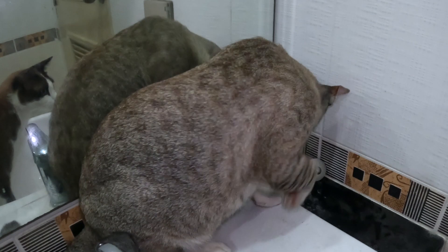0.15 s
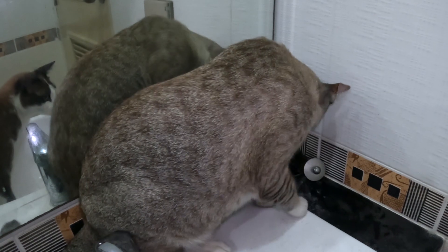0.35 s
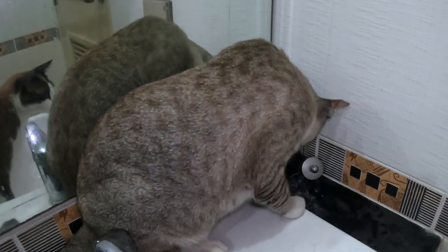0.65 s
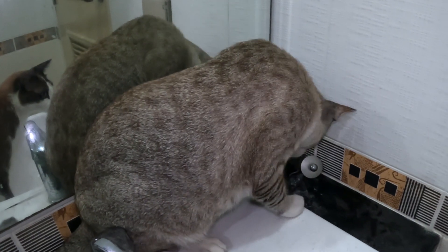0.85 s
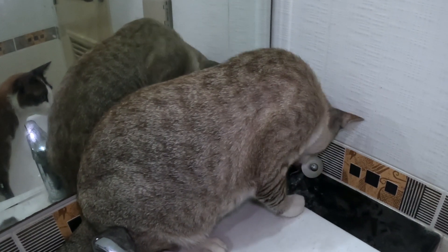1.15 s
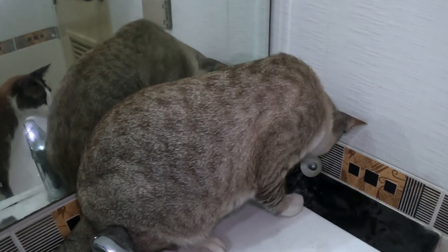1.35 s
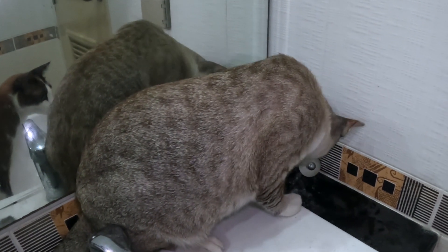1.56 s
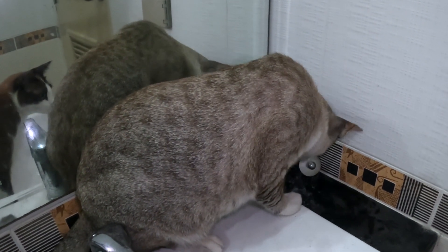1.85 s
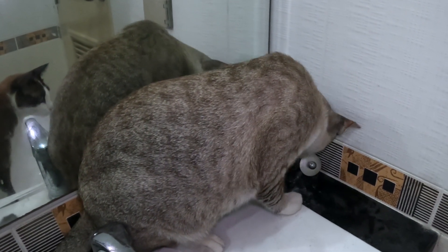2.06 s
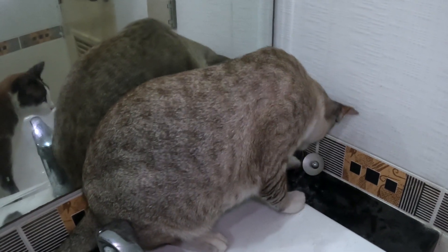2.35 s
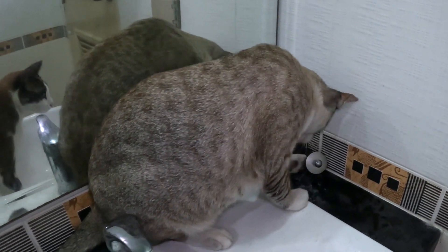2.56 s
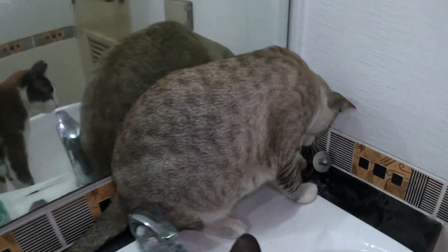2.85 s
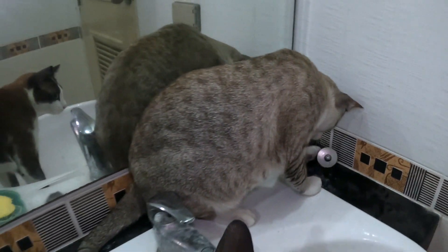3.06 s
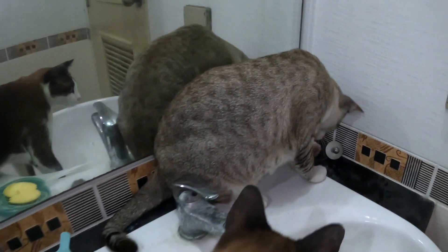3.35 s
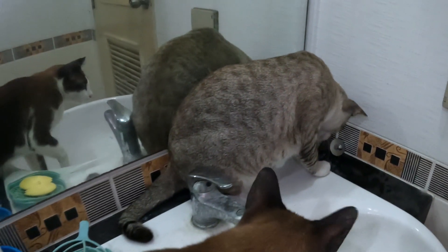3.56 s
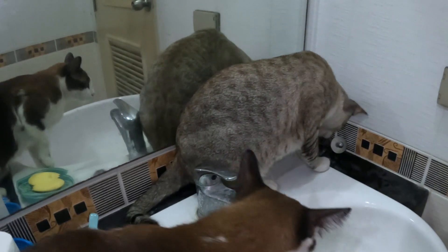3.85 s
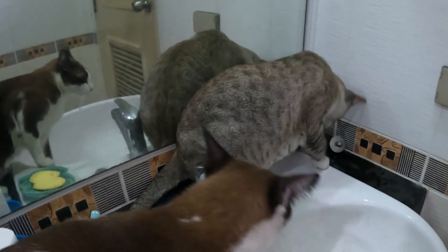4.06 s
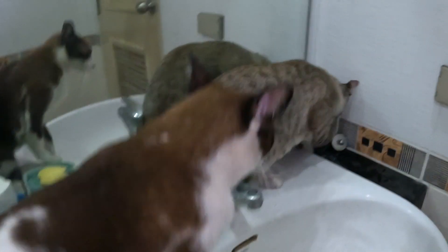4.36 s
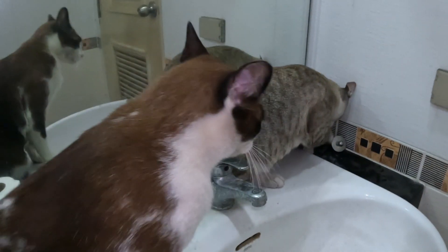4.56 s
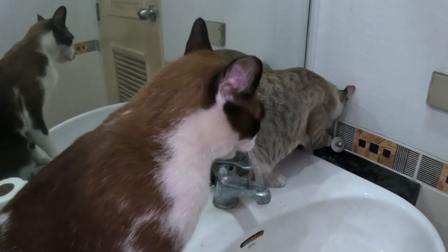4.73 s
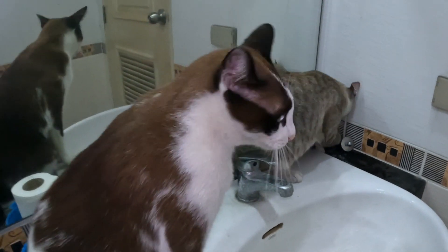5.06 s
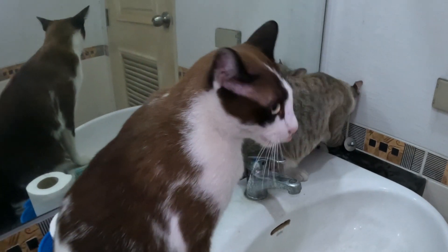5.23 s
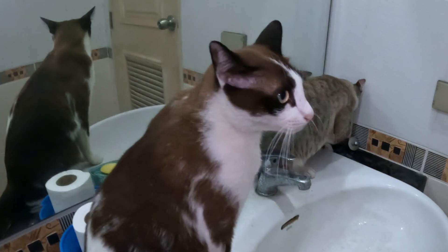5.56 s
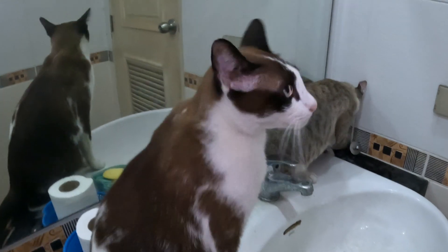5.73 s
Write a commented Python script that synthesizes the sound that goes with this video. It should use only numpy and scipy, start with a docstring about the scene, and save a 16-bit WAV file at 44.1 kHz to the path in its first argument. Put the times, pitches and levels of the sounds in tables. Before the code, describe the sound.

Over a soft rush of air and a low fan hum, a cornered mouse gives a run of very short, high squeaks. They thin out while a dull paw knock and several sharp claw clicks sound on a counter, then come back in a longer, hoarser burst before trailing off. The microphone is nearby in a small bathroom whose tiles ring briefly after each sound.

```python
"""Tiled bathroom: a mouse, cornered by a cat behind the sink, squeaks in clusters.
Thin whistles break into rasps (uneven vocal fold pulses ringing the throat) and lower, arched squeals.
Paws bump and claws click on the counter; near walls echo and the tiles ring on.
A fan's mains hum and soft rush of air fill the room and stir its low modes."""
import sys
import numpy as np
from scipy import signal
from scipy.fft import rfft, irfft, next_fast_len
from scipy.io import wavfile
from scipy.ndimage import map_coordinates

SR = 44100
rng = np.random.default_rng(int(sys.argv[2]) if len(sys.argv) > 2 else 0)


def transcribe(signal):
    """Save signal, clipped to [-1, 1], as a 16-bit WAV file at the path in sys.argv[1]."""
    frames = np.atleast_2d(signal).T
    limited = np.clip(frames, -1, 1)
    pcm = np.round(limited * 32767).astype(np.int16)
    wavfile.write(sys.argv[1], SR, pcm)


N = 259969

# motor hum lines: f/Hz, relative level/dB
HUM_LINES = [(100.1, -57), (200.2, -75), (300.3, -86)]
# hum envelope: t/s, level/dB
HUM_LEVEL = [(.8, -49), (2.8, -50.5), (5.2, -53.5)]
# air rush spectrum: f/Hz, relative density/dB
AIR_SPECTRUM = [(20, -24), (45, -25), (80, -11.5), (170, -14), (260, -14.5), (450, -17), (950, -25.5),
                (1400, -20.5), (3000, -25.5), (7000, -36.5), (10500, -48), (12800, -34), (14000, -37)]
# air rush envelope: t/s, level/dB
AIR_LEVEL = [(1.2, -61), (2.4, -58)]
# low room modes: f/Hz, half-width/Hz, level/dB
ROOM_MODES = [(70, 2.8, -71.5), (126.9, 6.6, -64.5), (147, 16, -65), (311.5, 8.3, -74)]
# envelope of all modes: t/s, gain/dB
MODE_GAIN = [(1.2, 5), (1.7, -1.5), (3.1, 2.5), (4.5, -12), (5.8, -4)]
# paws on the counter: t/s, scuff level/dB, t60/s, scuff tilt/(dB/oct), knock f/Hz, knock level/dB
PAW_BUMPS = [(1.470, -63, 0.22, 1.5, 600, -79), (1.570, -58, 0.18, -1, 600, -82),
             (1.836, -58.5, 0.45, 0.5, 600, -76), (2.504, -48.5, 0.27, -3.5, 610, -66),
             (2.522, -34, 0.055, -5, 656, -39.5), (3.023, -46, 0.44, -2, 403, -58),
             (3.604, -48, 0.41, -5, 635, -50), (3.612, -49, 0.43, -0.5, 294, -50)]
# paw scuff spectrum: f/Hz, relative density/dB
SCUFF_SPECTRUM = [(30, -41), (200, -9), (400, -6), (750, 0.5), (1100, -3.5), (2500, 6.5), (6500, -2),
                  (10000, -10.5), (16000, -16)]
# thin high squeaks: t/s, length/s, f/Hz, level/dB, 2nd harmonic/dB, roughness/0-1
WHISTLES = [ (1.642, 0.018, 3577, -42, -13.5, 0.11), (1.869, 0.016, 3777, -41, -5.5, 0.28),
            (1.928, 0.015, 3830, -32, -7.5, 0.29), (2.118, 0.013, 3768, -34, -11.5, 0.09),
            (2.2, .045, 3650, -35, -8, .55), (2.239, 0.025, 3645, -32.5, -8, 0.16),
            (2.54, 0.043, 3567, -38, -2, 0.54), (2.592, 0.02, 3715, -30.5, -11, 0.2),
            (2.887, .018, 3810, -35.5, -12.5, 0.1), (3.224, 0.054, 3825, -42, -21, 0.13),
            (3.747, 0.12, 3810, -40, -2.5, 0.21), (4.2455, 0.056, 3850, -31.5, -17, 0.08),
            (4.420, 0.01, 3830, -29, -9.5, 0), (4.475, 0.0055, 3985, -28, -2, 0),
            (4.681, 0.0345, 3876, -33.5, -5, .1), (4.783, 0.061, 3815, -33, -9.5, 0.11),
            (4.907, 0.011, 3905, -38.5, -10, 0.15), (5.071, 0.034, 3870, -33.5, -8.5, 0.16),
            (5.151, 0.03, 3744, -34.5, -6.5, 0.11), (5.471, 0.047, 3835, -37, -1, 0.08),
            (5.839, 0.019, 3830, -41, -6.5, 0.09)]
# voice brightness, muffled then shrill: t/s, tilt/(dB/oct)
VOICE_TILT = [(1.9, -3.5), (2.6, -3.5), (3.7, 2.5), (4.4, 1), (5.5, 1)]
# hoarse cries: t/s, length/s, f/Hz, start offset/share of f, level/dB, pulse scatter/cycles
RASPS = [ (1.874, 0.0085, 1142, 0.09, -46, 0.086), (1.917, 0.018, 1362, -0.053, -42, 0.07),
         (2.196, 0.056, 846, 0.53, -38, 0.11), (2.537, 0.053, 849, 0.41, -34, 0.19),
         (3.776, 0.03, 741.5, 0.082, -44.5, 0.32), (4.284, 0.035, 959, -0.041, -34.5, 0.22),
         (4.334, 0.092, 1174, 0.06, -35.5, 0.21), (4.484, 0.062, 1173, 0, -36, 0.245),
         (4.707, 0.0756, 761.5, 0, -34, 0.081), (4.908, 0.033, 775, -0.07, -32, 0.14),
         (5.095, 0.071, 755, -0.019, -37, 0.1), (5.308, 0.022, 1213, -0.038, -39, 0.11)]
# throat response: f/Hz, gain/dB
THROAT_RESPONSE = [(400, -54), (900, -14.5), (1500, -1.5), (2400, 5.5), (3000, 0.5), (3700, 3.5),
                   (4600, 0.5), (5700, -3.5), (7400, -6), (8500, 2.5), (10500, -15), (13000, 0.5),
                   (16000, -40)]
# lower cries: t/s, length/s, top f/Hz, climb/share of f, level/dB, 2nd harmonic/dB, roughness/0-1
SQUEALS = [ (1.917, .016, 2750, 0.15, -36, -14, 0.23), (4.306, 0.042, 2472, .19, -37, 10, 0.07),
           (4.349, 0.035, 2341, 0.0208, -35, 5, 0.3), (4.491, .048, 2403, 0.0498, -36, 2.5, 0.1),
           (4.728, 0.02, 2237, 0.021, -38.5, -6, 0.18), (4.913, 0.015, 2435, 0.115, -40, -9, 0.45),
           (5.096, 0.046, 2280, 0.028, -37, -.5, 0.09), (5.309, 0.038, 2428, 0.024, -41.5, -2.5, 0.38)]
# claws on the counter: t/s, level/dB, ring f/Hz
CLAW_CLICKS = [(2.826, -19.5, 1730), (2.869, -27.5, 1920), (3.288, -29, 1900), (3.313, -29, 2330),
               (3.486, -24, 4600), (3.498, -24.5, 4670), (3.529, -25.5, 1850), (4.464, -26, 1920),
               (4.615, -33, 2740), (5.435, -32, 1860)]
# claw strike colour: f/Hz, gain/dB
CLAW_RESPONSE = [(500, -57), (1100, -17), (1500, 0), (2200, -1.5), (3000, -3.5), (4800, -8), (5700, -20.5),
                 (8000, -25), (11000, -28), (15000, -40)]
# tiled room decay: f/Hz, t60/s
TILE_DECAY = [(150, 0.86), (600, 0.48), (1500, 0.61), (3700, 0.46), (7500, 0.44), (14000, 0.49)]
# microphone response: f/Hz, gain/dB
MIC_RESPONSE = [(20, -2), (7800, -1.5), (8700, -11), (9100, -16.5), (9600, -8.5), (10500, 1), (13000, -24),
                (14000, -18), (16000, -14)]


def amp(db):
    """dB to gain."""
    return 10 ** (np.asarray(db) / 20)


def unit(x):
    """Scale to rms 1."""
    return x / np.sqrt(np.mean(x ** 2) + 1e-20)


def along(points, hz):
    """(f/Hz, value) rows read on a log axis."""
    f, v = np.transpose(points)
    return np.interp(np.log(hz + 1), np.log(f + 1), v)


def curve(rows):
    """(t/s, value) rows read at every sample."""
    return np.interp(np.arange(N) / SR, *np.transpose(rows))


def wobble(rate_hz, n):
    """Smooth random curve, rate_hz knots a second."""
    knots = rng.standard_normal(int(n * rate_hz / SR) + 4)
    return map_coordinates(knots, [np.arange(n) * rate_hz / SR])


def filtered(x, response):
    """Zero-phase filter with gain response(hz)."""
    n = x.shape[-1]
    m = next_fast_len(n + 8192)
    return irfft(rfft(x, m) * response(np.fft.rfftfreq(m, 1 / SR)), m)[..., :n]


def coloured(x, spectrum, tilt_db_oct=0):
    """Minimum-phase filter with a tilted spectrum."""
    n, m = len(x), 2 * len(x)
    hz = np.fft.rfftfreq(m, 1 / SR)
    gain_db = along(spectrum, hz) + tilt_db_oct * np.log2(np.maximum(hz, 200))
    cepstrum = irfft(np.log(amp(gain_db)))
    response = np.exp(rfft(2 * cepstrum[:n], m) - cepstrum[0])
    return irfft(rfft(x, m) * response)[:n]


def noise(spectrum, n, tilt_db_oct=0):
    """Coloured noise, rms 1."""
    white = rng.standard_normal(n)
    return unit(filtered(white, lambda hz: amp(along(spectrum, hz) + tilt_db_oct * np.log2(hz + 1))))


def band_noise(hz, half_width_hz, n, order=1):
    """Noise in one resonance, rms 1."""
    white = rng.standard_normal(n)
    return unit(filtered(white, lambda f: 1 / (1 + ((f - hz) / half_width_hz) ** 2) ** order))


def pulses(places, sizes, n):
    """Impulses at fractional sample positions."""
    taps = np.floor(places)[:, None].astype(int) + np.arange(-8, 9)
    shapes = sizes[:, None] * np.sinc(taps - places[:, None])
    return np.bincount(np.maximum(taps, 0).ravel(), shapes.ravel(), n)[:n]


def gate(t, length_s, attack_s, release_s=0.0016):
    """Rise, hold, decay after length_s."""
    return (1 - np.exp(-t / attack_s)) * np.exp(-np.maximum(t - length_s, 0) / release_s)


def add(track, start_s, sound):
    """Mix in at start_s."""
    i = round(start_s * SR)
    track[i:i + len(sound)] += sound[:max(N - i, 0)]


def fan(fade_in_s=0.13):
    """The motor hums at twice the mains rate; its rush of air stirs the room's low modes."""
    t = np.arange(N) / SR
    lines = 0
    for k, (hz, db) in enumerate(HUM_LINES):
        drift_rad = (0.6 if k else 0.02) * wobble(6.9, N)
        lines += amp(db) * np.sin(2 * np.pi * hz * t + drift_rad)
    hum = unit(lines) * amp(curve(HUM_LEVEL))
    modes = sum(amp(db) * band_noise(hz, half_width_hz, N) for hz, half_width_hz, db in ROOM_MODES)
    air = noise(AIR_SPECTRUM, N) * amp(curve(AIR_LEVEL) + 0.22 * wobble(8, N))
    fade_in = (1 - np.exp(-t / fade_in_s)) ** 1.9
    return (hum + modes * amp(curve(MODE_GAIN)) + air) * fade_in


def paws(attack_s=0.0002):
    """Soft pads knock the counter dully and trail off into a scuff."""
    out, t = np.zeros(N), np.arange(SR // 3) / SR
    for start_s, scuff_db, t60_s, tilt_db_oct, knock_hz, knock_db in PAW_BUMPS:
        knock = amp(knock_db) * band_noise(knock_hz, knock_hz / 3, len(t), order=2)
        scuff = amp(scuff_db) * noise(SCUFF_SPECTRUM, len(t), tilt_db_oct)
        envelope = amp(-60 * t / t60_s) * (1 - np.exp(-t / attack_s))
        add(out, start_s, (knock + scuff) * envelope)
    return out


def voice_tilt_db_oct(time_s):
    """Brightness of the voice at time_s."""
    return np.interp(time_s, *np.transpose(VOICE_TILT))


def cry(pitch_hz, second_db, third_db, rough):
    """Four harmonics on a pitch contour; strain shakes pitch and strength."""
    n = len(pitch_hz)
    jitter = 1 + rough * (0.12 * wobble(2133, n) + 0.049 * wobble(340, n))
    phase = 2 * np.pi * np.cumsum(pitch_hz * jitter) / SR
    levels_db = [0, second_db, third_db, third_db - 11]  # 4th lies past the throat's last resonance
    tone = sum(amp(db) * np.sin(k * phase) for k, db in enumerate(levels_db, 1))
    shimmer_db = (1 + 6 * rough) * wobble(130, n) + 6 * rough * wobble(1100, n)
    return np.sqrt(2) * tone * unit(amp(shimmer_db))


def whistles(scoop_share=0.13, scoop_s=0.00085, sag_per_s=0.4, strain_drop=0.1135):
    """Each snaps up to pitch, then sags as breath runs out, further when strained."""
    out, t = np.zeros(N), np.arange(SR // 6) / SR
    for start_s, length_s, hz, db, second_db, rough in WHISTLES:
        scoop = scoop_share * np.exp(-t / scoop_s)
        sag = (sag_per_s + strain_drop * rough / length_s) * np.minimum(t, length_s)
        third_db = -22.5 + 0.31 * second_db + 3.9 * voice_tilt_db_oct(start_s)
        voice = cry(hz * (1 - scoop - sag), second_db, third_db, rough)
        add(out, start_s, amp(db) * voice * gate(t, length_s, attack_s=0.00017))
    return out


def rasps(settle_s=0.015, swell_share=0.053):
    """The folds drop to a low, stumbling beat of uneven pulses that ring the throat."""
    out, t = np.zeros(N), np.arange(SR // 6) / SR
    n = len(t)
    for start_s, length_s, hz, offset, db, scatter_cycles in RASPS:
        pitch_hz = hz * (1 + offset * np.exp(-t / settle_s)) * (1 + 0.01296 * wobble(195.5, n))
        cycles = np.cumsum(pitch_hz) / SR
        beats = np.arange(int(cycles[-1]))
        timing, strength = rng.standard_normal((2, n))[:, :len(beats)]
        places = np.interp(beats + scatter_cycles * timing, cycles, t * SR)
        folds = pulses(places, amp(2.5 * strength), n)
        voice = coloured(folds, THROAT_RESPONSE, voice_tilt_db_oct(start_s))
        flutter = amp(2.3 * wobble(96, n))
        push = amp(np.interp(t / length_s, [0, 0.5, 1], [-5, 1, -1]))
        envelope = push * gate(t, length_s, attack_s=swell_share * length_s, release_s=0.0031)
        add(out, start_s, amp(db) * unit(voice * flutter) * envelope)
    return out


def squeals(crest_share=0.85, detune_loss_db=65):
    """The lower register climbs in an arch; at the top its 3rd harmonic meets a throat resonance."""
    out, t = np.zeros(N), np.arange(SR // 6) / SR
    for start_s, length_s, top_hz, climb, db, second_db, rough in SQUEALS:
        progress = np.minimum(t / length_s, 1)
        below_top = climb * np.cos(np.pi / 2 * progress / crest_share) ** 2
        third_db = second_db + 1.5 + voice_tilt_db_oct(start_s) - detune_loss_db * below_top
        voice = cry(top_hz * (1 - below_top), second_db, third_db, rough)
        add(out, start_s, amp(db) * voice * gate(t, length_s, attack_s=0.0031))
    return out


def claws(ring_width_hz=600):
    """A hard tip strikes: a brief crack and a short ring, pitched by the spot it hits."""
    out, t = np.zeros(N), np.arange(SR // 20) / SR
    envelope = amp(-60 * t / 0.013) + amp(-31 - 60 * t / 0.042)
    for start_s, db, ring_hz in CLAW_CLICKS:
        crack = rng.standard_normal(len(t)) * envelope
        ring = signal.lfilter(*signal.iirpeak(ring_hz, ring_hz / ring_width_hz, SR), crack)
        click = coloured(crack + amp(-2) * ring, CLAW_RESPONSE)
        add(out, start_s, amp(db - 20) * unit(click))  # rms about 20 dB under the peak
    return out


def bathroom(x, wet_db, early_db, build_s=0.0021):
    """Near walls return six quick echoes; the tiles ring on."""
    hz, t, spectra = signal.stft(rng.standard_normal(SR * 3 // 4), SR, nperseg=256)
    decay = amp(-60 * t / along(TILE_DECAY, hz)[:, None])
    _, tail = signal.istft(spectra * decay, SR, nperseg=256)
    tail *= 1 - np.exp(-np.arange(len(tail)) / SR / build_s)
    response = amp(wet_db) * tail / np.linalg.norm(tail)
    echo_taps = rng.integers(SR // 700, SR // 50, size=6)
    response[echo_taps] += amp(early_db)
    return x + signal.fftconvolve(x, response)[:N]


def scene():
    """One small room, both channels alike."""
    mouse = whistles() + squeals() + rasps()
    sound = bathroom(mouse + claws() + paws(), wet_db=-0.5, early_db=-19) + fan()
    return np.array([sound, sound])


def record(dry):
    """Microphone: a treble notch from its port, and a hard band limit."""
    top_hz = 15750
    return filtered(dry, lambda hz: amp(along(MIC_RESPONSE, hz)) * (hz < top_hz))


dry = scene()
out = record(dry)
transcribe(out)
```